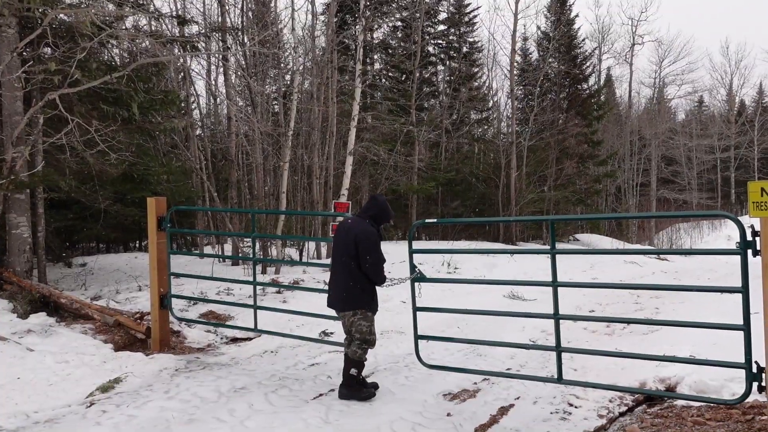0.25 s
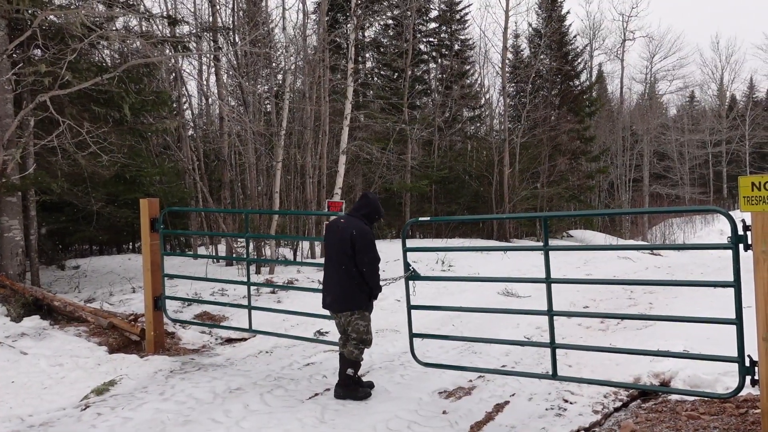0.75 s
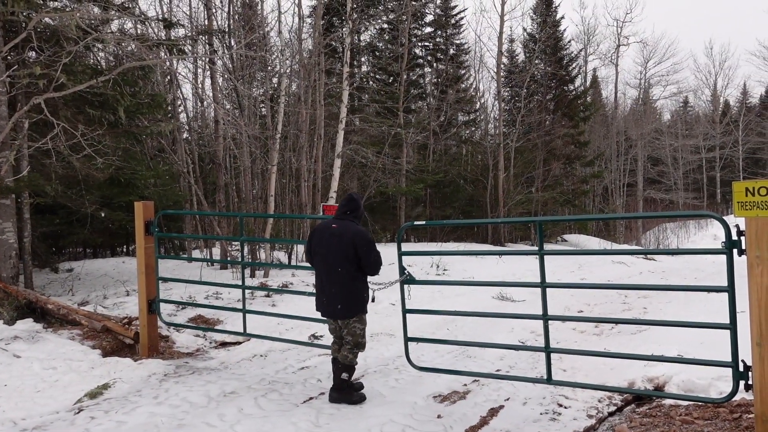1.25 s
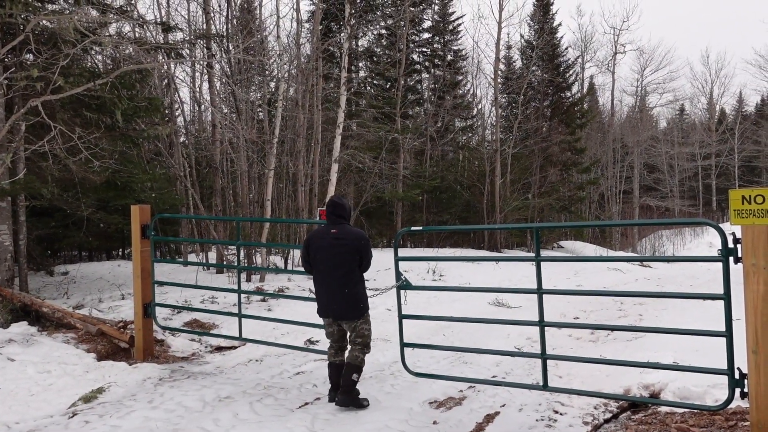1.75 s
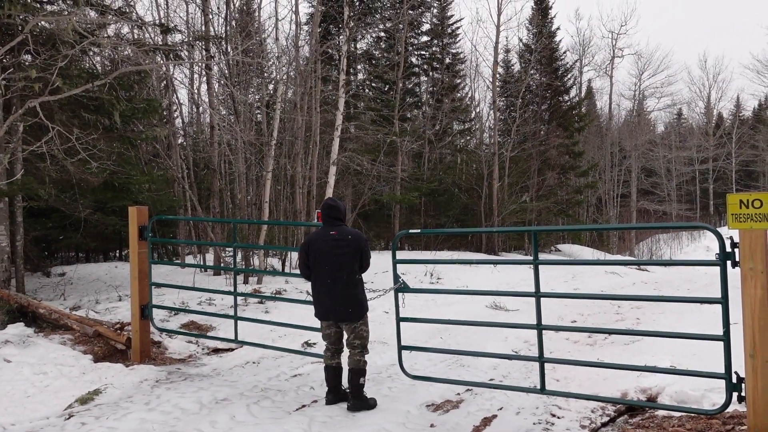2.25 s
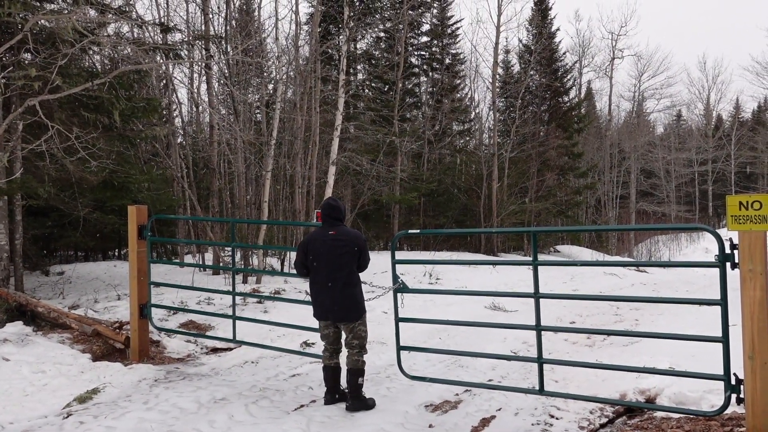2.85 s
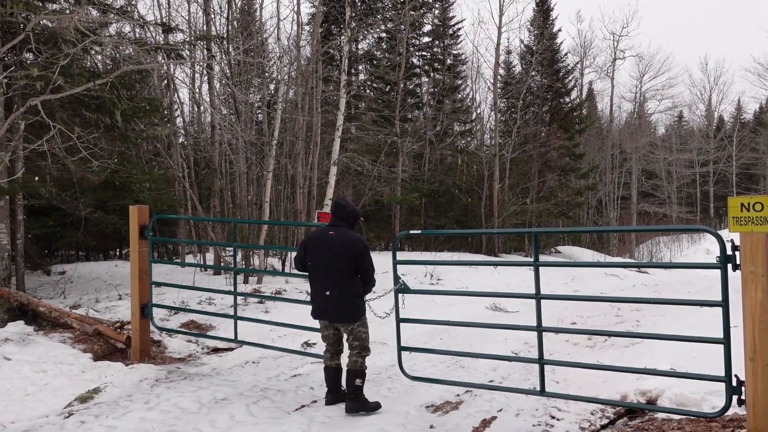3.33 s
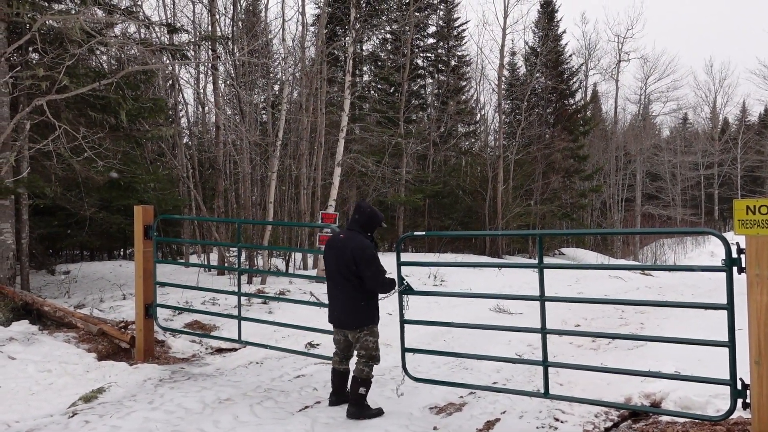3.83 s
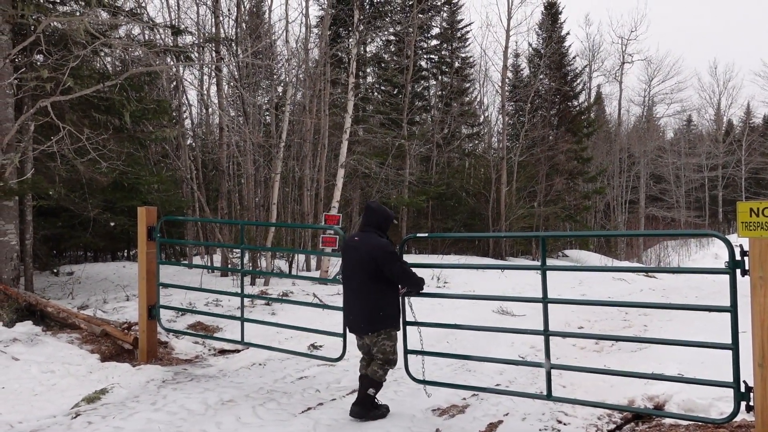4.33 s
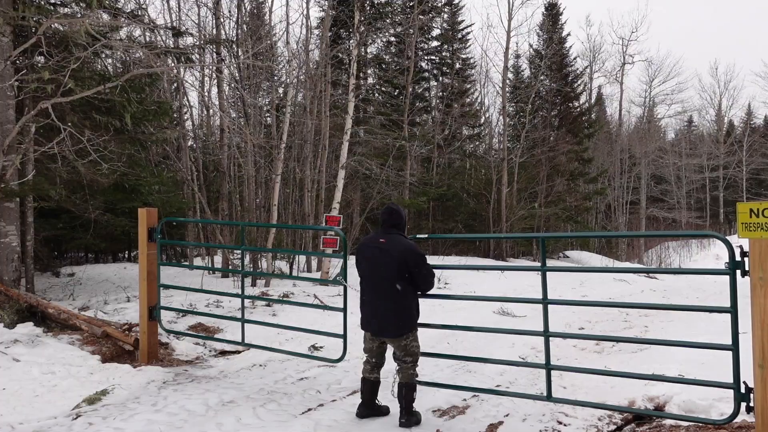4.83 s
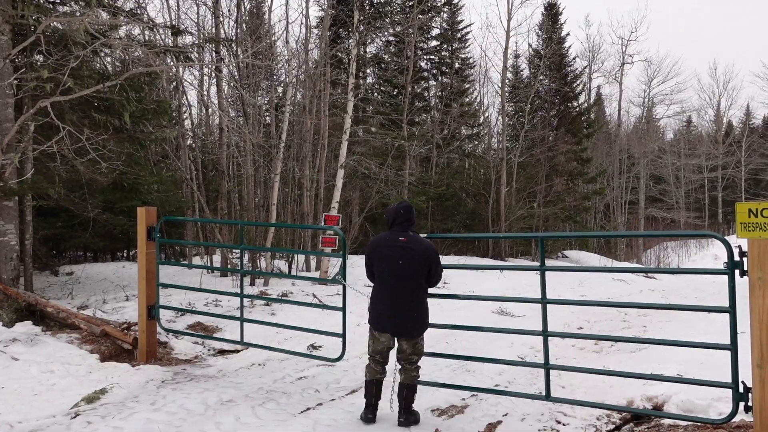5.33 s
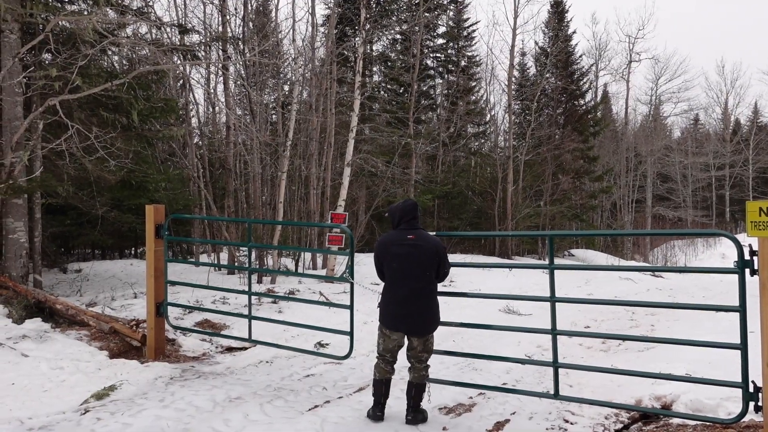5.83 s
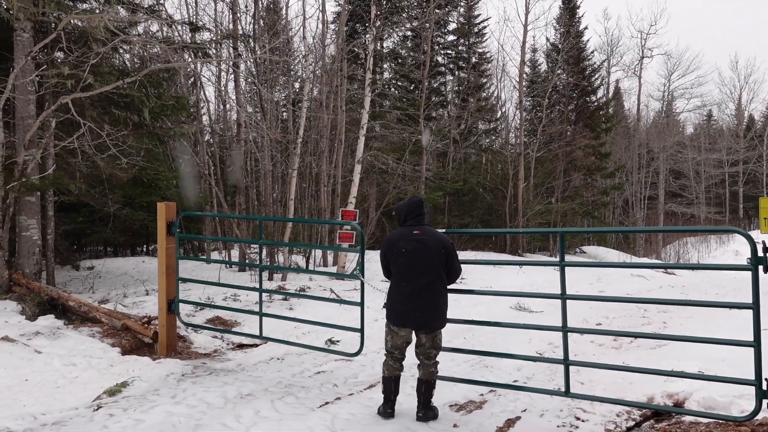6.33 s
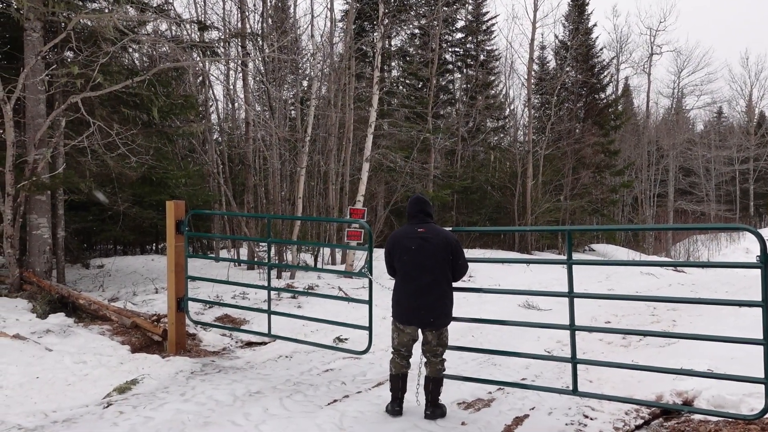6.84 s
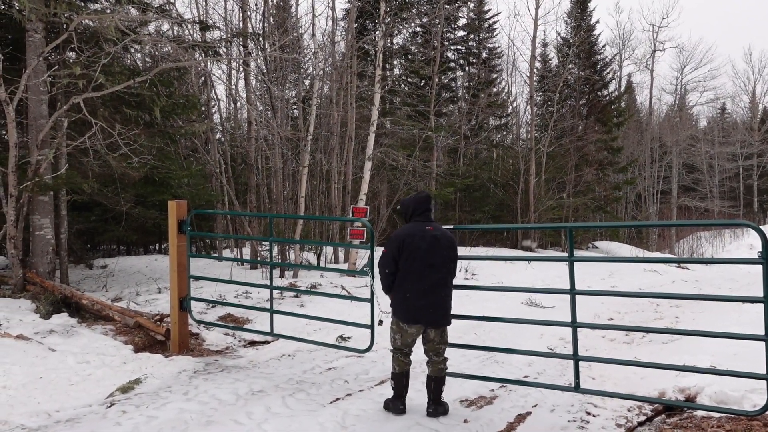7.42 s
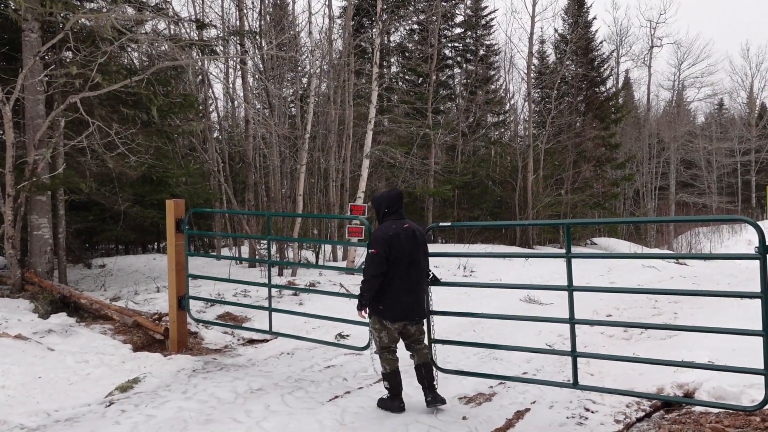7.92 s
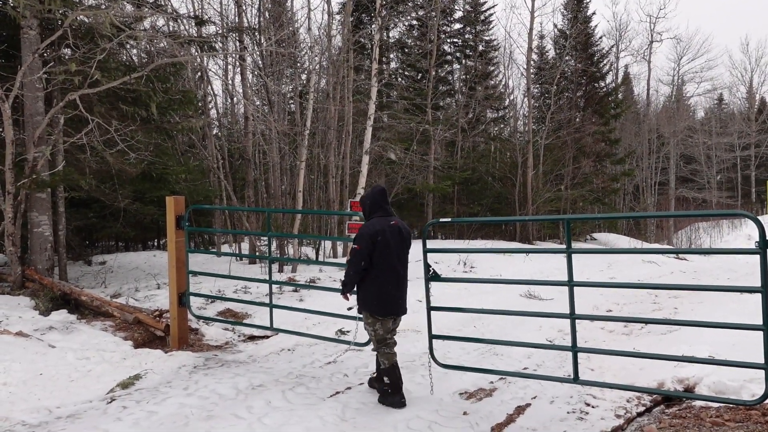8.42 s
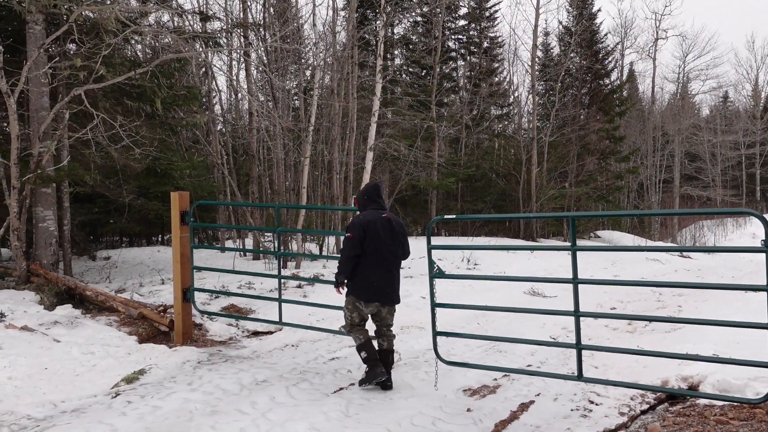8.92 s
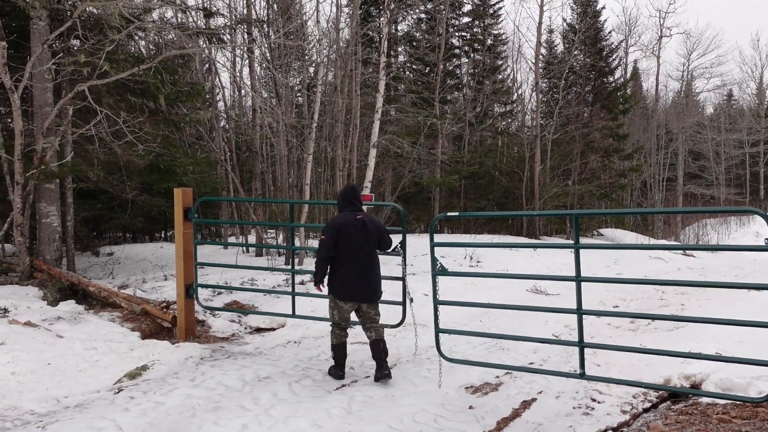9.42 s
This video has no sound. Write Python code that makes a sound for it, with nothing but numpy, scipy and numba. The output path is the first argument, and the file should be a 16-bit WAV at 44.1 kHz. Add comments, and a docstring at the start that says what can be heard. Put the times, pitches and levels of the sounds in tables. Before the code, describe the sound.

Quiet outdoor scene at a moderate distance, almost centred: loose chain links tap hollow metal tubes, ringing thinly. After three seconds the chain comes loose with hard clanks, very high tinkling and a grating drag. More scattered clinks and rattles follow, leaning slightly right, then a strong scraping clank and longer ringing, a few snowy steps, and a final bright clank. A faint low airy hush lies beneath.

```python
"""Steel clanks, scrapes and bright jingles over a hushed snowy wood: a chain is unwrapped from hollow
steel-tube gates some metres away. Links knock and drag on the tubes, kicking a dense crowd of decaying
modes; loose links clink as beating high sines. Boots are short low thuds and swells of low noise, dry
ticks are bursts of noise, and the still air is a stack of drifting noise bands."""
import sys
import numpy as np
from numba import njit
from scipy import signal
from scipy.io import wavfile
from scipy.ndimage import uniform_filter1d, map_coordinates

SR = 44100
rng = np.random.default_rng(int(sys.argv[2]) if len(sys.argv) > 2 else 0)


def digitize_waveform(pressure):
    """Quantize a signal to 16-bit integers and store it at the path in sys.argv[1].

    Rows of a 2-D input are taken as channels; values are limited to [-1, 1].
    """
    field = np.atleast_2d(pressure).T
    bounded = np.clip(field, -1, 1)
    quanta = np.round(bounded * 32767).astype(np.int16)
    wavfile.write(sys.argv[1], SR, quanta)


N = 426447

# a hand holds the right-hand gate: its low modes are woken less and the clatter sits to the right
HELD_S, GRIP_S = (3.5, 7.55), 0.2  # start and end; fade at each end
FREE_BASS_DB, HELD_BASS_DB, HELD_PAN_DB = 9.5, -5.5, -2.5
# once let go, unchained, the gate sings more freely, until the chain meets the other gate
FREED_BASS_DB, FREED_TREBLE_DB, OTHER_GATE_S = 7.5, 3.5, 9.5
# contacts of higher favoured pitch carry more treble; so do stronger ones
TREBLE_DB_PER_OCTAVE, TREBLE_DB_PER_DB, EVEN_HZ, EVEN_DB = 10, 0.7365, 3290, -29
TOUCHES_PER_S = 160  # while the chain drags
LOOSE_FROM_S, FAINT_CLINKS, FAINT_CLINK_DB = 3.05, 12, -48.5  # the chain's end hangs loose from here on
CLINK_T60_S, REBOUND_DB = 0.2, -5  # decay time; level change at each rebound
STEP_HZ, STEP_S = 209, 0.0026  # thud pitch; time to its envelope's peak
TICK_HZ = 6200
WOOD_DB = -56  # rms level
TOP_HZ = 15950  # upper cutoff


def undb(db):
    """dB to gain."""
    return 10 ** (np.asarray(db) / 20)


def band(hz, width_hz):
    """Noise of rms 1 around a centre."""
    x = signal.lfilter(*signal.iirpeak(hz, hz / width_hz, fs=SR), rng.standard_normal(N))
    return x / x.std()


def add(out, at_s, sound):
    """Mix a short sound in at a time."""
    i = min(int(at_s * SR), N)
    out[i:i + len(sound)] += sound[:N - i]


def walk(per_s):
    """Random levels joined by straight lines."""
    count = int(per_s * N / SR) + 2
    return np.interp(np.arange(N), np.linspace(0, N, count), rng.standard_normal(count))


def held(t):
    """1 while the gate is held, 0 while it hangs free."""
    return np.clip(np.minimum(t - HELD_S[0], HELD_S[1] - t) / GRIP_S, 0, 1)


def bump(hz, centre_hz, width_octaves):
    """A bell of height 1 around a pitch."""
    return np.exp(-(np.log2(hz / centre_hz) / width_octaves) ** 2)


def wood():
    """Still air among trees: half-octave bands that drift alone, partly unlike left and right."""
    # spectrum of the air: (frequency [Hz], relative level per Hz [dB])
    air_spectrum = np.array([(18, -58), (30, -27), (197, 9.5), (639, 4), (874, 14.5), (1200, 4), (1360, 0),
                             (2360, 6.5), (8500, -56), (12300, -21.5), (15500, -30.5)])
    out = 0
    for hz in 50 * 2 ** np.arange(0, 8.3, 0.5):
        db = np.interp(np.log(hz), np.log(air_spectrum[:, 0]), air_spectrum[:, 1])
        db = db + 10 * np.log10(hz)  # wider bands hold more power
        db = db + 2.5 * walk(6.6)
        common = band(hz, hz / 3)
        unlike = 0.37 * band(hz, hz / 3) * np.array([[1], [-1]])
        out = out + undb(db) * (common + unlike)
    return out / out.std() * undb(WOOD_DB)


def touches():
    """All contacts in order: each knock rebounds once, each drag is a run of uneven touches."""
    # links knocking: (time [s], strength [dB], favoured pitch [Hz], how far it stands out [dB])
    knocks = np.array([(0.0629, -41.5, 1730, 12), (0.3222, -37.5, 1920, -2), (0.5195, -35, 1970, 0),
                       (0.6988, -41.5, 2630, 4), (0.981, -49.5, 1830, 11), (1.1287, -38.5, 2480, 15),
                       (1.2414, -42.5, 2280, 9), (1.5022, -51, 2630, 9), (1.5263, -40.5, 1790, 13),
                       (1.7174, -36, 5820, 14), (1.9543, -39.5, 1750, 1), (2.0982, -38, 1907, 16.5),
                       (2.1191, -35.5, 3830, 9), (2.2325, -37, 1800, 12), (2.2724, -27.5, 5070, 8),
                       (2.6209, -38.5, 2360, 18), (2.7578, -37, 2490, 14), (2.9168, -32.5, 1895, 15),
                       (3.058, -28.5, 3430, 7), (3.0936, -22.5, 2550, 8.5), (3.1392, -17, 3500, 4.5),
                       (3.1975, -21.5, 5210, 10.5), (3.24, -38, 1860, 16.5), (3.7822, -20, 6600, 10),
                       (3.815, -18.5, 5940, 12.5), (4.272, -32.5, 1760, 12), (4.4113, -38, 1570, 5),
                       (4.4865, -38.5, 1610, 9), (4.5145, -28, 1830, 8), (4.5666, -27, 1843, 17),
                       (4.591, -23, 6720, 12), (4.6898, -24, 4100, -3), (4.74, -26.5, 4340, 4),
                       (4.802, -22, 4920, 8.5), (4.836, -22.5, 2200, 11), (4.9807, -32.5, 2130, 6),
                       (5.0446, -36.5, 1777, 0), (5.1008, -42, 1720, 7), (5.2742, -41.5, 1740, 10),
                       (5.4862, -28, 1723, 12.5), (5.5106, -26, 2520, 18), (5.5603, -27, 4540, 21),
                       (5.617, -23.5, 2480, 12), (5.8261, -35.5, 1710, 9), (5.8704, -22.5, 3770, 9),
                       (6.2899, -19, 3920, 5), (6.4807, -26, 4450, 10), (6.5655, -25, 4510, 16),
                       (6.6858, -34, 2480, 18), (6.7383, -23, 3560, 4), (6.7661, -22.5, 4050, 2),
                       (6.821, -18, 5500, 10.5), (6.8536, -20, 3850, 8), (7.045, -33, 2401, 15),
                       (7.1678, -35.5, 2190, 4), (7.856, -39, 1720, 8), (7.8812, -33.5, 1640, 9),
                       (8.025, -23.5, 1810, 12), (8.1225, -16.5, 4600, 1), (8.19, -17.5, 1880, 8),
                       (8.5, -24, 4082, 9), (8.6872, -30.5, 2620, 9), (9.0453, -29, 1786, 20),
                       (9.3364, -33.5, 5970, 6.5), (9.5102, -37.5, 2820, 10), (9.5537, -31, 6160, 15),
                       (9.5921, -17, 6020, 11)])
    # chain dragged over a tube: (start [s], length [s], middle strength of a touch [dB],
    # favoured pitch [Hz], how far it stands out [dB])
    drags = [(0.0, .8, -53, 1970, 0), (1.722, 0.026, -37, 4290, 14), (3.153, .12, -32.5, 1835, 10.5),
             (3.822, .22, -23.5, 2690, -6), (4.593, .1, -39, 4550, -12), (5.517, .12, -37, 3730, 15.5),
             (6.298, .05, -47, 2490, 9), (6.83, 0.067, -38.5, 4700, 21), (8.132, .15, -21, 1930, 1.5),
             (8.508, .04, -39.5, 4300, 7), (9.601, .07, -28.5, 1800, 16)]
    delay_s = 0.002 + 0.005 * rng.random((len(knocks), 1))
    rebounds = knocks + [1, 0, 0, 0] * delay_s + [0, -2.4, 0, 1]
    rows = [knocks, rebounds]
    for start, length, db, *colour in drags:
        chance = rng.random((int(TOUCHES_PER_S), 2))
        t = np.cumsum(0.3 + 1.4 * chance[:, 0]) / TOUCHES_PER_S
        size_db = db + 14 * (chance[:, 1] - 0.5)
        run = np.column_stack([start + t, size_db, np.tile(colour, (len(t), 1))])
        rows.append(run[t < length])
    rows = np.vstack(rows)
    return rows[np.argsort(rows[:, 0])]


@njit(fastmath=True)
def ring(at, kick, a1, a2, lean):
    """Two-pole modes kicked at given samples; each leans a little to one side."""
    out, y1, y2, k = np.zeros((2, N)), np.zeros(len(a1)), np.zeros(len(a1)), 0
    for i in range(N):
        while k < len(at) and at[k] <= i:
            y2 -= kick[k]
            k += 1
        mid, side = 0., 0.
        for m in range(len(a1)):
            y = a1[m] * y1[m] - a2[m] * y2[m] + 1e-18  # the speck avoids slow denormals
            y2[m], y1[m] = y1[m], y
            mid += y
            side += lean[m] * y
        out[0, i], out[1, i] = mid + side, mid - side
    return out


def gate(count=800):
    """Every contact lands on another spot, so it wakes each mode with another strength and sign."""
    # strongest tube modes, the last two being the brief crack of the contact:
    # (frequency [Hz], relative level [dB], t60 [s])
    tube_modes = [(385.2, -38, 0.39), (560, -32, 0.95), (636.5, -23, 1.4), (728.3, -30.5, 3.2),
                  (801.3, -25, 1.9), (1000, -32, 0.78), (1184, -15.5, 2.1), (1258, -10, 0.83),
                  (1586, -9, 1.47), (1628, 1, 0.27), (1824, -4, 1.19), (2127, -7.5, 0.67), (2430, 0, 0.71),
                  (2514, -17.5, 1.1), (2650, 2.5, 0.24), (3150, -3, 0.5), (3793, -10.5, 1),
                  (3976, -10.5, 0.87), (4250, -21.5, 0.54), (4360, -8, 0.34), (4340, -17, 0.45),
                  (4580, -3, 0.47), (4760, -24.5, 0.66), (5071, -15, .5), (5200, -27, 0.24),
                  (5521, -10.5, .35), (5756, 1, 0.41), (6020, -9.5, 0.34), (7060, -9, 0.16),
                  (2325, 3, 0.039), (4130, 0, 0.03)]
    # trend of the crowd of weaker modes: (frequency [Hz], relative level [dB], t60 [s])
    crowd = np.array([(323, -57.5, 4.9), (750, -33, 0.74), (1335, -14.5, 0.94), (1365, -21.5, 0.32),
                      (1670, -9, 0.5), (3300, -8.5, 0.32), (4120, -6.5, 0.52), (5700, -12.5, 0.41),
                      (7480, -13.5, 0.24), (10710, -29.5, 0.2), (13200, -48, 0.29), (16000, -38.5, .15)])
    # modes that change once the gate is freed: (frequency [Hz], level change [dB])
    freed_modes = [(385, 14), (553, 8), (636, -1), (728, 10), (1820, 0.5), (4350, 8)]

    chance = rng.standard_normal((count, 2))
    hz = np.sort(300 + 15700 * rng.random(count) ** 1.5)
    db, t60 = (np.interp(np.log(hz), np.log(crowd[:, 0]), crowd[:, c]) for c in (1, 2))
    # lossy modes take more from a blow and give it back sooner
    loss = 0.36 * chance[:, 1]
    weak_modes = np.column_stack([hz, db + 0.77 * chance[:, 0] + 4.16 * loss, t60 * np.exp(-loss)])
    hz, db, t60 = np.vstack([tube_modes, weak_modes]).T

    # rows are contacts, columns are modes
    at, strength_db, favoured, focus_db = touches().T[:, :, None]
    freed = (at > HELD_S[1]) & (at < OTHER_GATE_S)
    gripped_bass_db = FREE_BASS_DB + (HELD_BASS_DB - FREE_BASS_DB) * held(at)
    bass_db = np.where(freed, FREED_BASS_DB, gripped_bass_db)
    treble_db = TREBLE_DB_PER_OCTAVE * np.log2(favoured / EVEN_HZ)
    treble_db = treble_db + TREBLE_DB_PER_DB * (strength_db - EVEN_DB) + FREED_TREBLE_DB * freed
    octave = np.log2(hz / 2500)
    colour_db = bass_db * np.clip((-octave - 0.9) / 0.74, 0, 1)
    colour_db = colour_db + treble_db * np.clip(octave / 2.42, 0, 1)
    colour_db = colour_db + focus_db * bump(hz, favoured, 0.036)
    colour_db = colour_db + freed * sum(more_db * bump(hz, f, 0.0084) for f, more_db in freed_modes)

    spot = rng.standard_normal((len(at), len(hz)))
    strong = spot[:, :len(tube_modes)]
    # strong modes are never missed altogether
    spot[:, :len(tube_modes)] = np.sign(strong) * (0.75 + 0.64 * np.abs(strong))
    size = spot * undb(strength_db + db + colour_db) / np.sqrt(np.sum(undb(2 * db)))
    turn = 2 * np.pi * hz / SR
    r = np.exp(-np.log(1000) / (t60 * SR))
    lean = 0.024 * rng.standard_normal(len(hz))
    starts = (at[:, 0] * SR).astype(np.int64)
    rung = ring(starts, size * np.sin(turn), 2 * r * np.cos(turn), r * r, lean)
    # the frame shakes on its hinges: the path to the listener wavers and the spectral lines blur
    place = np.arange(N) + 2.5 * uniform_filter1d(walk(22), size=900)
    rung = np.array([map_coordinates(side, [place], order=3, mode="nearest") for side in rung])
    # thin tubes radiate no bass
    return signal.sosfilt(signal.butter(4, 330, "high", fs=SR, output="sos"), rung)


def boots():
    """Short dull thuds, and a low shuffle that swells and fades."""
    # boots in snow: (time [s], level [dB])
    steps = [(0.057, -50), (1.845, -47.5), (4.205, -38), (4.681, -30), (4.722, -45), (5.029, -41.5),
             (5.079, -44), (7.565, -47.5), (8.158, -47), (9.191, -34), (9.422, -42.5)]
    # boots shuffling: (middle [s], half length [s], level [dB])
    shuffles = [(0.0, 0.43, -67), (3.447, 0.25, -61), (4.19, 0.22, -53), (5.087, 0.59, -60),
                (8.353, 0.15, -50.5), (9.5, 0.28, -63)]
    out, t = np.zeros(N), np.arange(int(0.06 * SR)) / SR
    thud = np.sin(2 * np.pi * STEP_HZ * t) * (t / STEP_S) * np.exp(1 - t / STEP_S)
    for at, level_db in steps:
        add(out, at, undb(level_db) * thud)
    t = np.arange(N) / SR
    swell = sum(undb(db) * np.exp(-((t - at) / half) ** 2) for at, half, db in shuffles)
    return out + swell * band(220, 150)


def links():
    """Links are nearly alike, so their modes beat; each clink is a dry tick and a few rebounds."""
    # loose links clinking together: (time [s], level [dB])
    clinks = [(0.5467, -53), (3.0982, -36), (3.1386, -28), (3.4246, -48), (3.592, -16.5), (3.6658, -16),
              (3.72, -15), (3.8516, -20), (3.8806, -10), (3.9414, -22), (3.9714, -18), (4.2228, -37.5),
              (4.2862, -41), (4.408, -33.5), (4.4916, -20), (4.8045, -37), (5.0366, -29.5), (5.11, -43),
              (5.252, -25), (5.3163, -33.5), (6.292, -31), (6.4467, -45), (6.8214, -36), (7.1137, -48),
              (7.339, -48.5), (7.755, -35), (7.8231, -39.5), (8.0506, -42), (8.118, -21), (8.1878, -23),
              (8.2357, -30), (8.2975, -33), (8.4902, -28), (8.57, -22), (8.8146, -40), (8.9506, -26),
              (8.997, -46), (9.0693, -33), (9.183, -40), (9.2589, -38), (9.5981, -30)]
    # modes of a link: (frequency [Hz], relative level [dB])
    link_modes = [(11290, -5.5), (11750, -15.5), (11975, 5.5), (12050, 9), (12115, -3.5), (12215, -8.5),
                  (12365, 6.5), (12490, -6), (12940, -27), (13085, -4.5)]
    out, t = np.zeros((2, N)), np.arange(int(0.45 * SR)) / SR
    hz, db = np.tile(np.transpose(link_modes), 2)[:, :, None]  # two links meet in each clink
    fade = 1000 ** (-t / CLINK_T60_S) * (1 - np.exp(-t / 0.0033))
    # random times, levels up to 8 dB above the faintest
    faint = rng.random((FAINT_CLINKS, 2)) * [N / SR - LOOSE_FROM_S, 8.0]
    faint = faint + [LOOSE_FROM_S, FAINT_CLINK_DB]
    for at, level_db in np.vstack([clinks, faint]):
        delays_s = np.cumsum(0.021 * rng.exponential(size=4) * [0, 1, 1, 1])
        for late, weaker_db in zip(delays_s, REBOUND_DB * np.arange(4)):
            level_chance, pitch_chance, side_chance = rng.standard_normal((3, len(hz), 1))
            size = undb(db + 5 * level_chance)
            tones = size * np.sin(2 * np.pi * hz * (1 + 0.006 * pitch_chance) * t)
            tones = tones / np.sqrt(np.sum(size ** 2))
            tick = np.diff(rng.standard_normal(len(t) + 1)) * np.exp(-t / 0.0023)
            for ear, sign in zip(out, (1, -1)):
                jingle = np.sum(tones * (1 + sign * 0.031 * side_chance), axis=0) * fade
                add(ear, at + late, undb(level_db + weaker_db) * (jingle + undb(-18.5) * tick))
    # the chain shivers faintly throughout
    shiver_db = 5 * walk(6)
    return out + undb(-78.5 + shiver_db) * band(12150, 500)


def ticks():
    """Dry ticks, as of crust snapping under a boot: each is a millisecond of noise around its pitch."""
    # (time [s], peak level [dB])
    snaps = [(1.8486, -18.5), (1.987, -47), (3.5385, -31), (3.5886, -18.5), (3.61, -19), (3.664, -17),
             (3.691, -22), (3.7034, -33), (4.2215, -25), (8.8564, -34), (8.8644, -31), (8.9506, -31.5),
             (9.189, -36), (9.2472, -30), (9.305, -22), (9.3773, -23), (9.3914, -24), (9.513, -24)]
    out, t = np.zeros(N), np.arange(int(0.01 * SR)) / SR
    for at, peak_db in snaps:
        burst = rng.standard_normal(len(t)) * np.exp(-t / 0.00037)
        burst = signal.lfilter(*signal.iirpeak(TICK_HZ, 0.7, fs=SR), burst)
        add(out, at, undb(peak_db) * burst / np.abs(burst).max())
    return out


def scatter(x):
    """Snow and trunks send the sound back faintly for a moment: a decaying noise tail."""
    t = np.arange(int(0.25 * SR)) / SR
    mid, side = rng.standard_normal((2, len(t))) * undb(-41.5) * np.exp(-t / 0.062)
    tail = mid + 0.033 * side * np.array([[1], [-1]])
    return x + signal.oaconvolve(x, tail, axes=1)[:, :N]


def scene():
    """The held gate is heard a little to the right, most in its upper middle; boots and air stay put."""
    near = scatter(gate() + links() + ticks())
    pan_db = HELD_PAN_DB * held(np.arange(N) / SR)
    upper_middle = signal.sosfilt(signal.butter(1, [2500, 7000], "band", fs=SR, output="sos"), near)
    panned = near + upper_middle * (undb(np.array([pan_db, -pan_db]) / 2) - 1)
    return panned + boots() + wood()


def record(dry):
    """The microphone's chain rounds the loudest peaks, drops the deep bass and cuts the top."""
    rounded = np.tanh(0.5 * dry) / 0.5
    thin = signal.sosfilt(signal.butter(2, 85, "high", fs=SR, output="sos"), rounded)
    return signal.sosfilt(signal.ellip(10, 0.2, 70, TOP_HZ, fs=SR, output="sos"), thin)


dry = scene()
out = record(dry)
digitize_waveform(out)
```